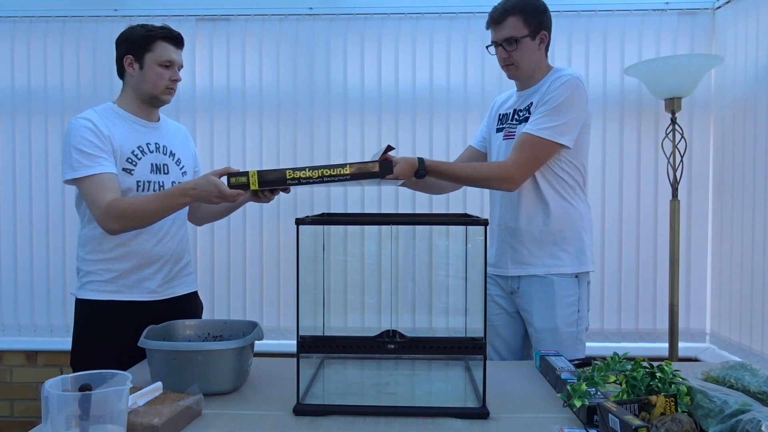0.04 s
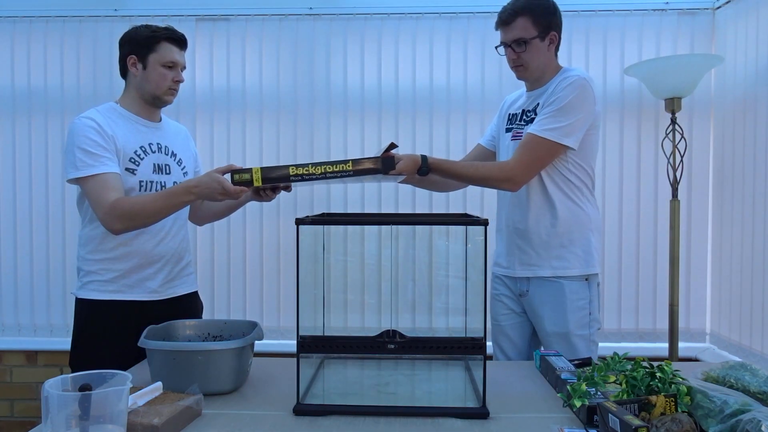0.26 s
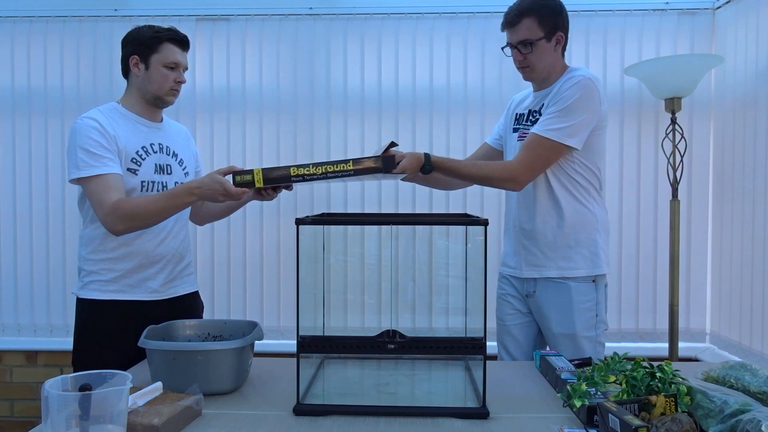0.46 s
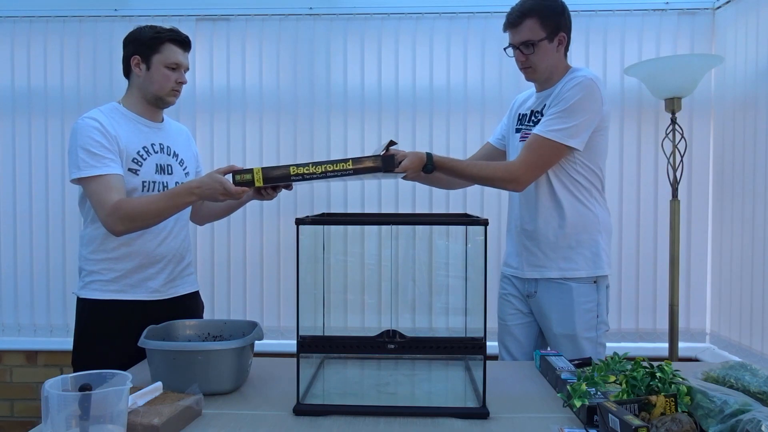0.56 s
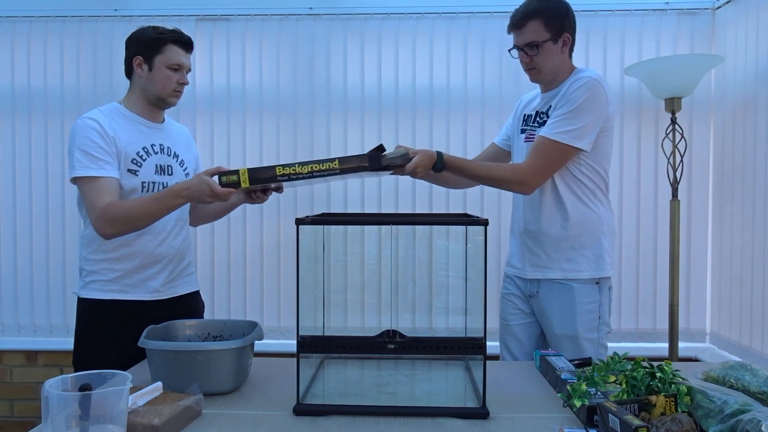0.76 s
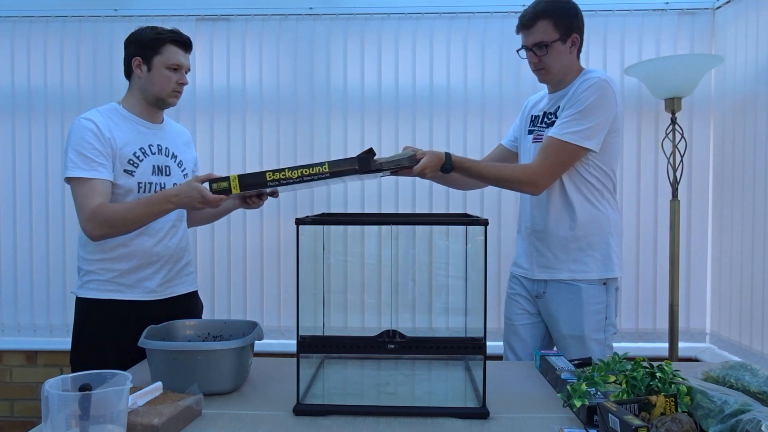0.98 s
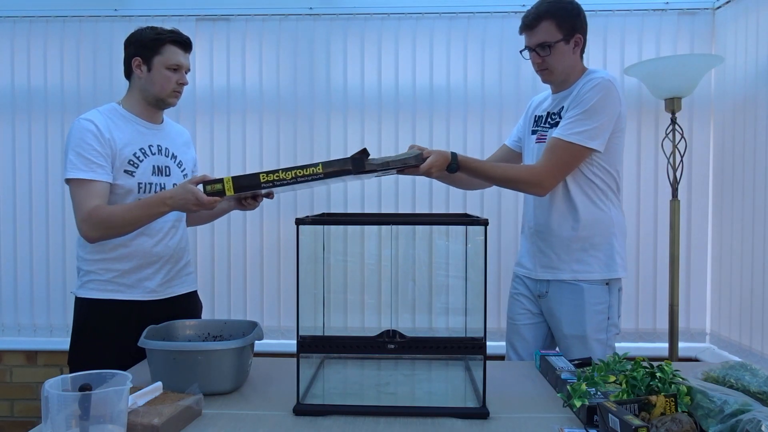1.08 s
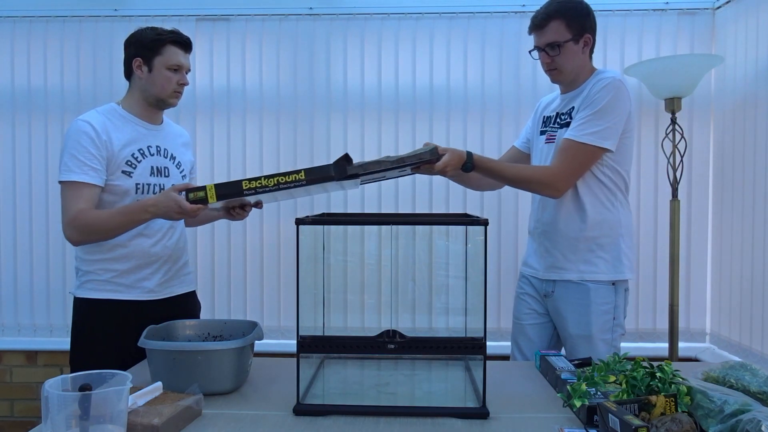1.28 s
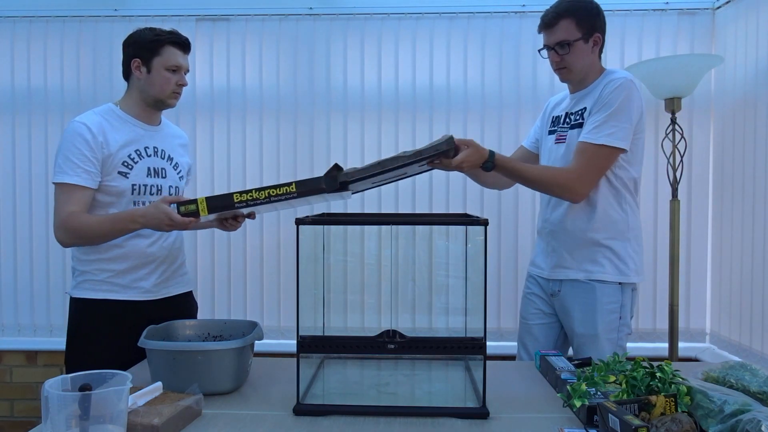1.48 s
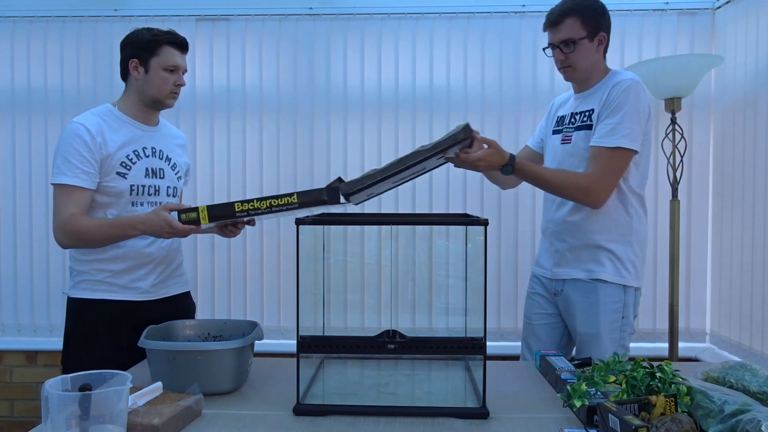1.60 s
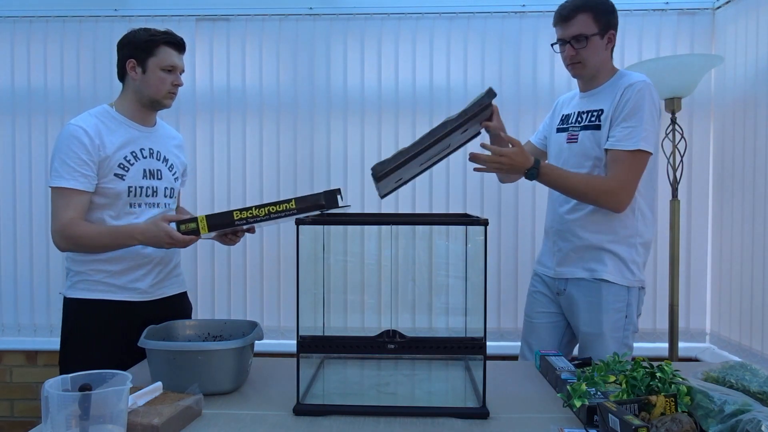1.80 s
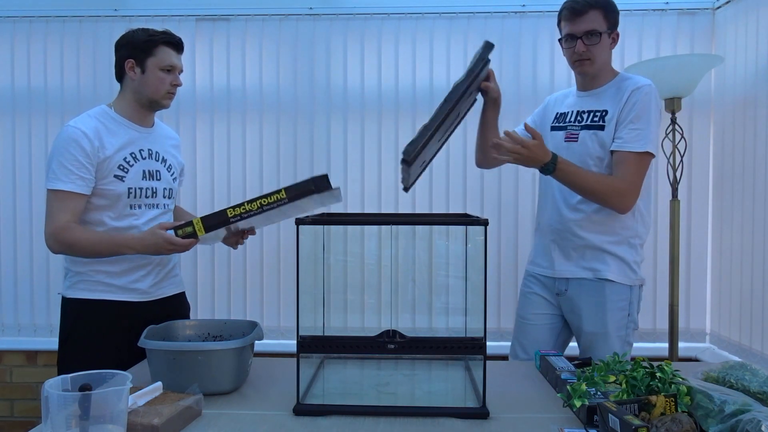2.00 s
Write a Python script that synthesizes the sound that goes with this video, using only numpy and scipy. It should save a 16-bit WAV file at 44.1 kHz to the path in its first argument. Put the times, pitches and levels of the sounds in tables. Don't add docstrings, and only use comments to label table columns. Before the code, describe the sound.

A foam panel scrapes out of a cardboard box with a loud squeaky rub, then flap knocks

```python
import sys
import numpy as np
from scipy import signal
from scipy.fft import rfft, irfft
from scipy.io import wavfile
from scipy.ndimage import uniform_filter1d

SR = 44100
rng = np.random.default_rng(int(sys.argv[2]) if len(sys.argv) > 2 else 0)


def digitize_waveform(pressure):
    field = np.atleast_2d(pressure).T
    bounded = np.clip(field, -1, 1)
    quanta = np.round(bounded * 32767).astype(np.int16)
    wavfile.write(sys.argv[1], SR, quanta)


def voltage_ratio(level):
    return 10 ** (np.asarray(level, float) / 20)


N = 90404

# time_s, pressure_db, brightness_db_per_octave, box_grip_db, squeal_db
PULL = [(0.14, -60, -6.5, 8, -4), (0.181, -41, -5.5, -6, 2), (.22, -35, -5, -14.5, -1),
        (.3, -37.5, -5, -9.5, -2.5), (.39, -37, -2.5, -1, 1), (.5, -36, -1, 6, 1.5),
        (.68, -30.5, 0, -0.5, -1), (.75, -34, 2.5, 8.5, -2), (.81, -34.5, 2.5, 9, 1.5),
        (.87, -33, -1, -4, 0.5), (.97, -32, -1.5, -6.5, -3.5), (1.14, -34, 0, 0.5, 0),
        (1.2, -33, -0.5, -14, 5), (1.26, -32.5, 0.5, -4.5, 0.5), (1.391, -32.5, -0.5, -2.5, 1),
        (1.45, -36, 0.5, 8.5, 0), (1.54, -37.5, 2, 3, 3), (1.652, -43, 3, 13, -5)]
# start_s, length_s, level_db, brightness_db_per_octave, rise_s
SHORT_RUBS = [
    (-.05, 0.08, -49, -2.4, 0.0088),
    (1.563, 0.011, -36, -3, 0.013),
    (1.635, 0.021, -32.5, 3.5, 0.022),
    (1.663, 0.018, -32.5, 4, 0.023),
    (1.68, 0.0078, -49, 0, .005),
    (1.7, 0.013, -41.5, -14, 0.016),
    (1.924, 0.015, -56, -4, 0.0024),
    (1.952, 0.0083, -80, -8.5, 0.004),
    (1.978, 0.057, -51.5, -3, 0.043),
]
# freq_hz, density_db_per_hz
FOAM_SPECTRUM = [(400, -50), (560, -28.5), (800, -13.5), (1500, -8.5), (3100, 0), (5500, -2.5), (8000, -5),
                 (11400, -5.5)]
# freq_hz, width_hz, level_db
WALL_MODES = [(150, 25, -27), (180, 23, -31), (300, 62, -21), (420, 49, -7), (698, 75, -5.5),
              (790, 67, -4.5), (1062, 25, -3.5), (1477, 54, 0), (1698, 36, 1.5), (2193, 70, -3.5),
              (2500, 49, -13.5), (2620, 95, -6)]
# time_s, level_db, rattle_ms
FLAP_KNOCKS = [
    (1.684, -36.5, 3.3),
    (1.709, -37.5, 9.4),
    (1.721, -53, 6.5),
]
# time_s, peak_db, pitch_hz
TAPS = [
    (1.924, -43, 1600),
    (1.9271, -40.5, 1610),
    (1.9303, -43, 3200),
    (1.9325, -43, 3000),
    (1.9648, -52, 2020),
    (1.682, -28, 875),
    (1.7084, -25, 1250),
    (1.721, -40, 1200),
]
# start_s, length_s, level_db, pitch_hz
BENDS = [(0.74, 0.1, -73, 210), (0.79, 0.052, -62.5, 320), (.84, 0.048, -73, 250), (0.885, 0.029, -59, 430),
         (0.6, 0.054, -42, 2700), (0.61, 0.048, -42, 3700), (.66, 0.061, -42, 1980),
         (1.17, 0.053, -36, 2640), (1.7, 0.034, -41, 3500), (1.1, .04, -45, 4300), (1.3, 0.038, -42, 3100),
         (0.71, .03, -80, 150), (1.43, 0.092, -81, 120), (1.199, 0.16, -80.5, 254),
         (1.334, 0.048, -59, 298), (1.33, 0.073, -60.5, 510), (1.44, 0.03, -66, 230),
         (1.63, 0.04, -55, 745), (.06, 0.1, -86.5, 450), (1.78, 0.091, -80.5, 175), (1.59, 0.028, -71, 180),
         (1.684, 0.025, -51.5, 350), (1.709, 0.011, -46.5, 405), (1.715, 0.048, -69.5, 150),
         (1.715, 0.05, -65.5, 180), (1.712, 0.021, -55.5, 280), (1.715, 0.024, -53, 626),
         (1.54, 0.009, -32, 3400), (1.655, 0.042, -35.5, 3500), (1.66, 0.025, -33, 4630),
         (1.688, 0.015, -28.5, 7240), (1.68, 0.012, -42, 8400), (1.68, 0.0061, -31, 5200),
         (1.69, 0.017, -41, 5300)]
# freq_hz, density_db_per_hz
AIR_SPECTRUM = [(18, -66), (30, -53), (225, -43), (400, -19), (1020, 9.5), (1280, 4), (1860, 7.5),
                (6120, 0), (10600, -11), (11400, -21), (14800, -51), (22000, -120)]
# freq_hz, t60_s
ROOM_T60 = [(150, 0.5), (400, 0.71), (1000, 0.42), (2500, 0.42), (5000, 0.4), (10000, 0.3)]
# freq_hz, correlation
LIKENESS = [(100, 0.67), (300, 0.95), (1000, 0.77), (2600, 0.78), (4000, 0.28), (5500, -0.052),
            (11000, -0.11)]
# start_s, length_s, low_hz, high_hz
LOW_GAPS = [(0.404, 0.104, 7, 296), (0.587, .04, -10, 425), (0.71, .032, 6, 496), (.75, .09, 4, 170),
            (0.801, .02, -4, 344), (0.881, .04, -6, 310), (0.928, 0.044, -24, 647), (0.97, .05, 9.5, 180),
            (1, 0.074, -9, 670), (1.06, .07, 1, 260), (1.134, .03, -1, 506), (1.245, .08, 0, 170),
            (1.332, .05, -8, 222), (1.335, .05, 356, 450), (1.345, .05, 578, 660), (1.367, .035, 0, 450),
            (1.519, .03, -3, 300)]


def read(points, hz):
    f, value = np.transpose(points)
    return np.interp(np.log(hz + 1), np.log(f + 1), value)


def evened(x):
    return x / np.sqrt(np.mean(x ** 2) + 1e-20)


def drift(seconds, count):
    hop = 64
    width = max(int(seconds * SR / hop), 1)
    slow = rng.standard_normal((count, N // hop + 1))
    for _ in range(2):
        slow = uniform_filter1d(slow, width, axis=1)
    return np.repeat(evened(slow), hop, axis=1)[:, :N]


def ring(x, hz, width_hz):
    r = np.exp(-np.pi * width_hz / SR)
    pole = r * np.exp(2j * np.pi * hz / SR)
    return 2 * signal.lfilter([1 - r], [1, -pole], x).real


def butter(x, order, hz, kind="lowpass"):
    return signal.sosfilt(signal.butter(order, hz, kind, fs=SR, output="sos"), x)


def pair(z, hz):
    same = np.clip(read(LIKENESS, hz), -1, 1)[:, None]
    common, apart = np.sqrt((1 + same) / 2), np.sqrt((1 - same) / 2)
    return np.array([common * z[0] + apart * z[1], common * z[0] - apart * z[1]])


def hush():
    hz, _, z = signal.stft(rng.standard_normal((2, N)), SR, nperseg=1024)
    shaped = pair(z, hz) * voltage_ratio(read(AIR_SPECTRUM, hz))[:, None]
    air = signal.istft(shaped, SR, nperseg=1024)[1][:, :N]
    return voltage_ratio(-60.5) * evened(air)


def rumble():
    level_db, cut_hz = -108, 90
    air = butter(rng.standard_normal((2, N)), 4, cut_hz)
    return voltage_ratio(level_db + 3 * drift(.03, count=1)) * evened(air + .4 * air[::-1])


def room(x, count=4):
    early_ms, early_db, gap_s, turns_per_s = 5.1, 1.5, .002, 13
    taps = np.zeros((2 * count, 24000))
    at = np.arange(0, 23980, 20) + rng.integers(0, 20, (2 * count, 1199))
    np.put_along_axis(taps, at, rng.choice([-1., 1.], at.shape), 1)
    hz, t, z = signal.stft(taps, SR, nperseg=256)
    t60_s = np.maximum(read(ROOM_T60, hz), .05)[:, None]
    fade = voltage_ratio(-60 * t / t60_s) + voltage_ratio(early_db) * np.exp(-1000 * t / early_ms)
    out = np.zeros((2, N))
    turn = 2 * np.pi * turns_per_s * np.arange(N) / SR
    for k in range(count):
        tail = signal.istft(pair(z[2 * k:], hz) * fade, SR, nperseg=256)[1]
        tail = np.pad(tail / np.linalg.norm(tail[0]), ((0, 0), (round(gap_s * SR), 0)))
        share = np.sqrt(2 / count) * np.cos((1 + k // 2 * 0.634) * turn + np.pi / 2 * k)
        out += signal.fftconvolve((x * share)[None], tail, axes=1)[:, :N]
    return out


def hum(push):
    hz, width_hz, level_db = 160, 87, -56
    tone = rng.standard_normal(N) * voltage_ratio(5.1 * drift(0.032, count=1)[0])
    for _ in range(3):
        tone = ring(tone, hz, width_hz)
    return voltage_ratio(level_db) * push * evened(tone)


def ticks():
    decay_cycles, cut_hz = .75, 500
    out, t = np.zeros(N), np.arange(600) / SR
    for s, db, hz in TAPS:
        swing = np.sin(2 * np.pi * hz * t) * np.exp(-t * hz / decay_cycles)
        out[round(s * SR):][:600] -= voltage_ratio(db) * swing * 1.41
    return butter(out, 3, cut_hz, "highpass")


def flexes():
    relative_width, clear_hz, lead_s = 0.084, 700, .05
    out, t = np.zeros(N), np.arange(8000) / SR
    for s, length, db, hz in BENDS:
        width_hz = relative_width * hz
        narrow = ring(rng.standard_normal(8000), hz, width_hz)
        tone = evened(ring(narrow, hz, 13.0 * width_hz))
        if hz < clear_hz:
            tone = .3 * tone + 1.3 * np.sin(2 * np.pi * (hz * t + rng.random()))
        swell = np.exp(-2 * ((t - lead_s - length / 2) / length) ** 2)
        at = round((s - lead_s) * SR)
        out[at:at + 8000] += voltage_ratio(db) * tone * swell
    return out


def motion():
    fall_s = 0.015
    t = np.arange(N) / SR
    s, level_db, tilt_db, grip_db, squeal_db = np.transpose(PULL)
    power = voltage_ratio(np.interp(t, s, level_db, left=-120, right=-120)) ** 2
    lean = power * np.interp(t, s, tilt_db)
    for start, length, db, tilt, rise in SHORT_RUBS:
        onset = np.sin(np.pi / 2 * np.clip((t - start) / rise, 0, 1)) ** 2
        fall = np.exp(-np.maximum(t - start - length, 0) / fall_s)
        rub_power = (voltage_ratio(db) * onset * fall) ** 2
        power = power + rub_power
        lean = lean + tilt * rub_power
    grip = np.interp(t, s, grip_db, left=0, right=0)
    squeal = np.interp(t, s, squeal_db, left=0, right=0)
    return np.sqrt(power), lean / power, grip, squeal


def box(push, grip_db):
    scrape_db, tilt_db, tick_db = -13.5, 7, -30
    scrape = rng.standard_normal(N) * push * voltage_ratio(scrape_db + grip_db)
    blows, wobble, t = np.zeros(N), drift(0.14, count=len(WALL_MODES)), np.arange(3000) / SR
    for s, db, rattle_ms in FLAP_KNOCKS:
        rattle = np.exp(-1000 * t / rattle_ms) * rng.standard_normal(3000)
        blows[round(s * SR):][:3000] += 12 * voltage_ratio(db) * rattle
    out = voltage_ratio(tick_db) * ring(np.diff(blows, prepend=0), 2500, 2500)
    for k, (hz, width_hz, db) in enumerate(WALL_MODES):
        drive = scrape * voltage_ratio(tilt_db * np.log2(hz / 1000) + 1.9 * wobble[k]) * 3.54
        mode = ring(drive, hz, width_hz) + ring(blows, hz, 3.1 * width_hz)
        out += (-1) ** k * voltage_ratio(db) * mode
    return out


def beads(push, bright, grip_db, squeal_db, count=38):
    slips_per_s, spread_db, cycles, glide = 900, 2.0, 4.2, 0.065
    patch_db, patch_s, judder_db, judder_s = .7, .03, .6, .008
    grip_share = 0.34
    squeal_hz, squeal_octaves = 3200, .55
    out, patch, judder = np.zeros(N), drift(patch_s, count=count), drift(judder_s, count=1)[0]
    patch = evened(uniform_filter1d(patch, size=4, axis=0))
    for k, hz in enumerate(np.geomspace(420, 11500, count)):
        u = np.arange(0, 1, hz / (cycles * SR))
        bend = 1 + glide * rng.uniform(-1.39, 1) * u
        chirp = np.sin(np.pi * u ** 0.72) ** 2 * np.sin(2 * np.pi * cycles * u * bend)
        chance, size = rng.random(N), rng.laplace(0, 1, N)
        hits = chance < slips_per_s * np.sqrt(hz / 3000) / SR
        slips = evened(hits * np.sign(size) * voltage_ratio(spread_db * np.minimum(abs(size), 4)))
        db = read(FOAM_SPECTRUM, hz) + bright * np.log2(hz / 3000)
        db = db + patch_db * patch[k] + judder_db * judder
        db = db + grip_share * grip_db * max(np.log2(2800 / hz), 0)
        db = db + squeal_db * np.exp(-(np.log2(hz / squeal_hz) / squeal_octaves) ** 2)
        voice = signal.oaconvolve(slips * voltage_ratio(db) * push, chirp / np.linalg.norm(chirp))[:N]
        out += voice * np.sqrt(hz / 20000)
    return out


def scene():
    scrape_cut_hz = 370
    direct_db, room_db, flex_wet, tick_wet = -9, -0.5, .3, 0.72
    lag_s, left_db = .000025, -0.2
    push, bright, grip_db, squeal_db = motion()
    rub = beads(push, bright, grip_db, squeal_db) + box(push, grip_db)
    rub = butter(rub, 4, scrape_cut_hz, "highpass")
    bend, taps = flexes(), ticks()
    near = rub * voltage_ratio(direct_db) + bend + taps
    delay = np.exp(-2j * np.pi * np.fft.rfftfreq(N, 1 / SR) * lag_s)
    late = irfft(rfft(near) * delay, N)
    wet = voltage_ratio(room_db) * room(rub + flex_wet * bend + tick_wet * taps) + hush() + hum(push)
    return (np.array([late, near]) + wet) * voltage_ratio(np.array([[left_db], [-left_db]]))


def starve(x):
    drop_db, edge_hz, edge_s = -24, 40, 0.012
    hz, t, z = signal.stft(x, SR, nperseg=1024, noverlap=896)
    shut = np.zeros(z.shape[1:])
    for s, length, low_hz, high_hz in LOW_GAPS:
        below_top = np.clip((high_hz - hz) / edge_hz + .5, 0, 1)
        above_bottom = np.clip((hz - low_hz) / edge_hz + 1, 0, 1)
        when = np.clip((length / 2 - abs(t - s - length / 2)) / edge_s + 1, 0, 1)
        shut = np.maximum(shut, (below_top * above_bottom)[:, None] * when)
    return signal.istft(z * voltage_ratio(drop_db * shut), SR, nperseg=1024, noverlap=896)[1][:, :N]


def low_pass(x):
    return signal.sosfilt(signal.butter(12, 12300, fs=SR, output="sos"), x)


def record(dry):
    bass_cut_hz, band_limit_hz = 148, 11040
    thin = butter(dry, 3, bass_cut_hz, "highpass")
    mix = starve(thin) + rumble()
    edge = np.clip((band_limit_hz - np.fft.rfftfreq(N, 1 / SR)) / 30, 0, 1)
    return low_pass(irfft(rfft(mix) * edge, N))


dry = scene()
out = record(dry)
digitize_waveform(out)
```